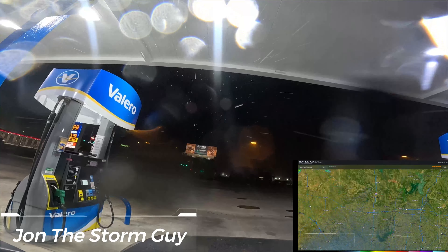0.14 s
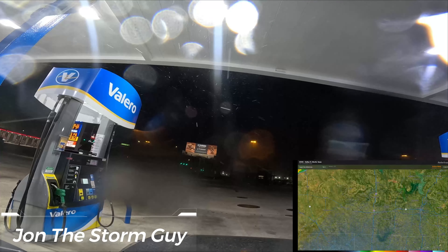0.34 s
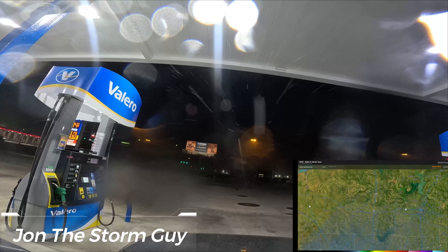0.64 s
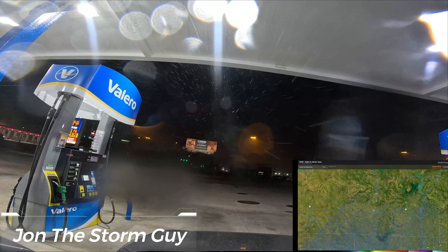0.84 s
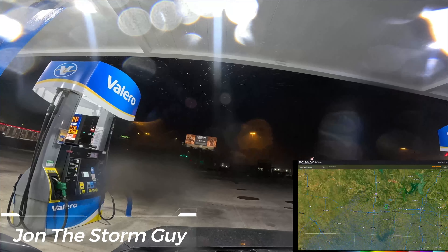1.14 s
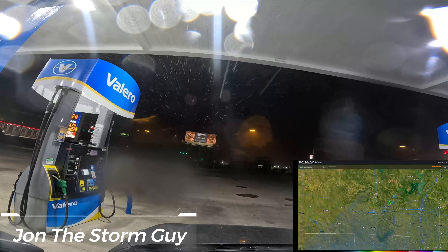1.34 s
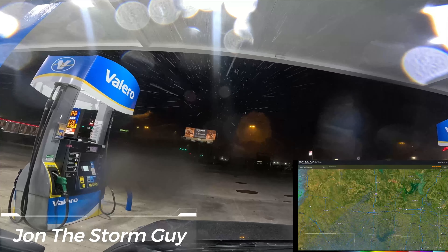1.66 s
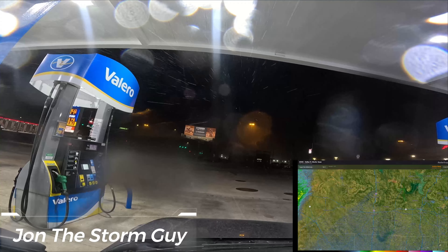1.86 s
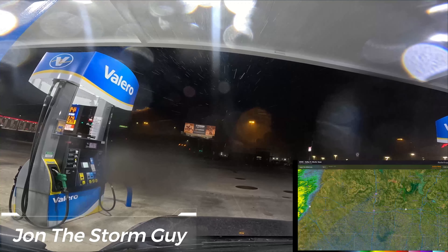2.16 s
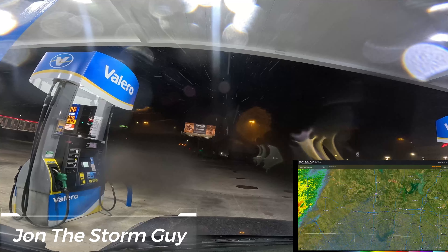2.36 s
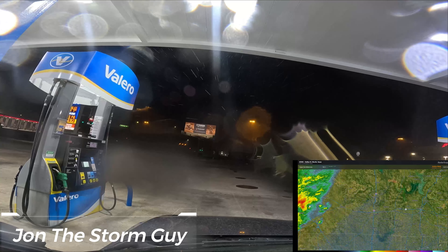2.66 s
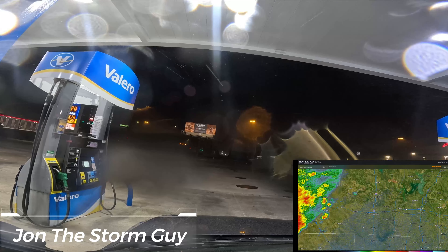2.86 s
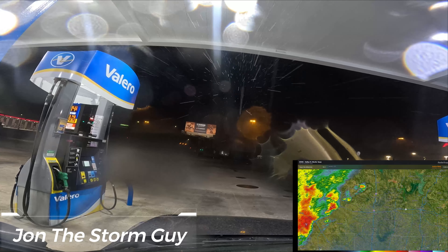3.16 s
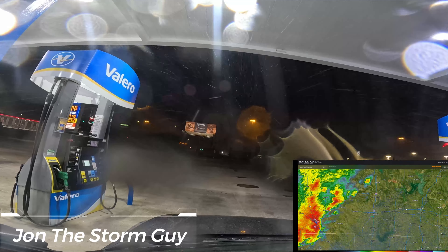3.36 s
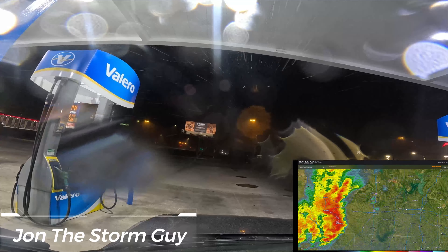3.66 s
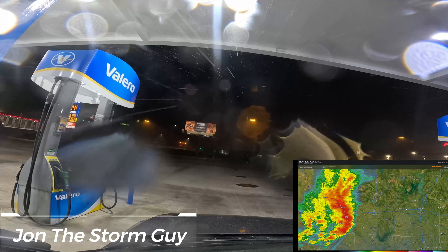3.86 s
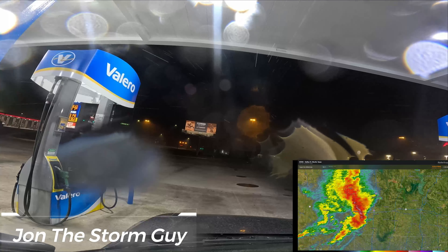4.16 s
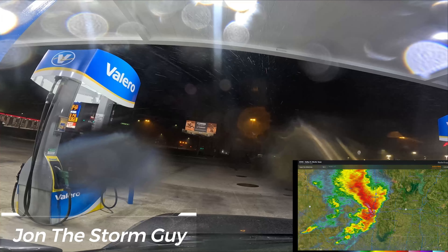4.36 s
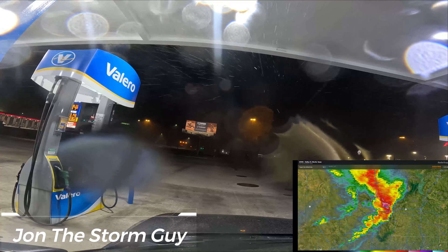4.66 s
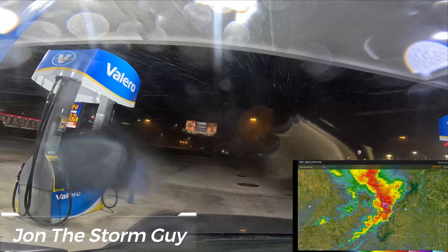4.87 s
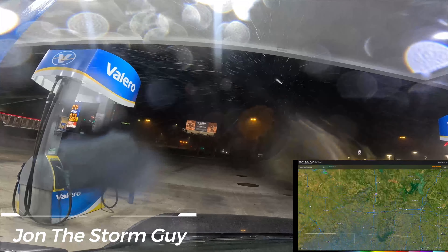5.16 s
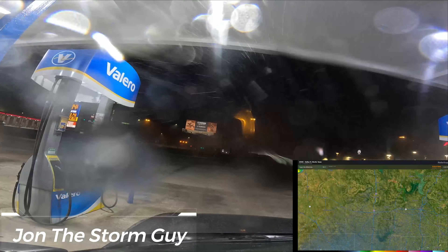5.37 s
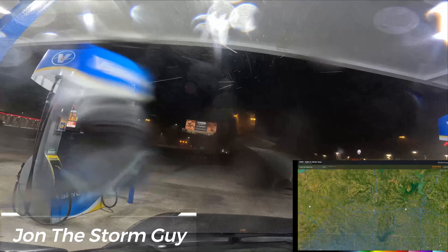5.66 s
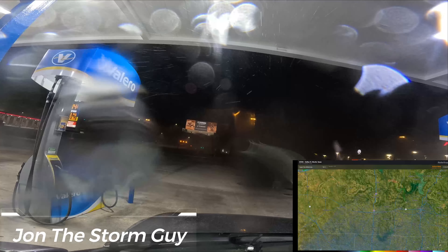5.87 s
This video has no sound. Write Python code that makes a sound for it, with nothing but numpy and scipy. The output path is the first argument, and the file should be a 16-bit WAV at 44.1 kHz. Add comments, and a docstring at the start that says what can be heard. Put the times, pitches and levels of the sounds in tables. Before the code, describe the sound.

Wind gusts rumble and tear at a small camera under a canopy while rain and hail tick sharply on its housing, thickening into dense flurries.

```python
"""Night storm at a small camera outside a car parked under a filling-station canopy.
Sharp gusts open it: noise rumbles, buffets and tears at the microphone ports; gusts recur to the end.
Struck resonances tick from the start as drops and hail hit the housing; at 0.7 s a stone knocks the body.
From 1.1 s the small drops come in flurries; from 4.6 s splats slosh and ring hollow, and gusts hoot.
Throughout, noise makes the downpour on canopy and forecourt, which grows towards the end."""
import sys
import numpy as np
from scipy import signal
from scipy.fft import rfft, irfft
from scipy.io import wavfile
from scipy.ndimage import uniform_filter1d, minimum_filter1d

SR = 44100
rng = np.random.default_rng(int(sys.argv[2]) if len(sys.argv) > 2 else 0)


def put_to_file(sound):
    """Save the sound as 16-bit audio at rate SR, in the file named by the first command-line argument."""
    columns = np.atleast_2d(sound).T  # one column per channel
    safe = np.clip(columns, -1, 1)
    whole_steps = np.round(safe * 32767)
    wavfile.write(sys.argv[1], SR, whole_steps.astype(np.int16))


N = 265041
TIME = np.arange(N) / SR
FREQS = np.fft.rfftfreq(N, 1 / SR)
SIDES = np.array([[1], [-1]])  # left, right

# wind between gusts, before trim: time_s, buffet_db
WIND = [(0, -20.5), (0.3, -26.5), (0.47, -31.5), (0.75, -32), (0.97, -28), (1.15, -27), (1.4, -27),
        (1.78, -25.5), (1.93, -33.5), (2.2, -24.5), (3.1, -27), (3.55, -26), (4.1, -25.5), (4.9, -25.5),
        (5.35, -29), (6.01, -23.5)]
# gusts: crest_s, length_s (crest to 1/e), rumble_rise_db, buffet_rise_db, tear_db
GUSTS = [(0.004, 0.0053, -7, 2.5, -26.5), (0.034, 0.008, -8, 4.5, -31), (0.053, 0.011, -7, -6.5, -56),
         (0.097, 0.01, 3, -2, -23), (0.135, 0.017, 3, 6, -24), (0.168, 0.017, -1, 6.5, -16),
         (0.214, 0.022, 2.5, 7, -18.5), (0.26, 0.024, 2.5, 3, -21.5), (0.329, 0.021, 4, 6, -29),
         (0.843, 0.021, 2.5, 1.5, -57), (1.095, 0.033, 2, 6.5, -40), (1.17, 0.026, 3, 7, -27.5),
         (1.286, 0.023, 5, 4, -40), (1.522, 0.057, 0.5, 5.5, -29), (1.71, 0.028, -4, 0, -25),
         (2.762, 0.09, 2.5, 4, -54), (3.102, 0.077, 1.5, 4.5, -32), (3.48, 0.024, 6, 2, -43),
         (3.928, 0.037, 3.5, 4.5, -31), (4.009, 0.02, 0.5, 0, -33), (4.112, 0.048, -1.5, 3.5, -53),
         (4.365, 0.059, -0.5, 4.5, -51), (4.477, 0.018, -4, 2, -39), (4.618, 0.016, 1, 8.5, -47),
         (4.81, 0.022, 2.5, -1, -48), (5.028, 0.038, 4, 4, -55), (5.094, 0.028, 1.5, 2, -23.5),
         (5.332, 0.021, 3.5, 5, -26.5), (5.561, 0.014, 3.5, 2.5, -23), (5.619, 0.04, 4.5, 6.5, -33),
         (5.808, 0.013, -8, 4, -24.5), (5.885, 0.026, 1.5, 2.5, -28.5)]
# large eddies let go of the ports: centre_s, length_s (centre to 1/e), rumble_change_db
LULLS = [(0.303, 0.013, -8), (0.45, 0.025, -5), (0.77, 0.018, -7), (0.91, 0.026, -6), (1.914, 0.032, -5),
         (2.2, 0.016, -8), (3.302, 0.03, -5), (3.525, 0.018, -4.5), (3.824, 0.0092, -5), (4.632, 0.012, -4),
         (5.378, 0.015, -6)]
# rumble follows the wind in part
RUMBLE_DB, RUMBLE_DB_PER_DB = -4, 0.5371
# noise colours of the wind, relative: frequency_hz, density_db
RUMBLE_COLOUR = [(10, -27), (24, 0), (45, -2.5), (80, -4), (120, -11.5), (200, -32), (400, -78),
                 (2000, -110)]
BUFFET_COLOUR = [(60, -13), (120, -1), (180, 0), (260, -6.5), (400, -14), (600, -20), (1000, -31.5),
                 (2000, -37.5), (10000, -100)]
TEAR_COLOUR = [(80, -3), (180, 11), (400, 7.5), (590, -0.5), (720, -4), (930, -1), (1400, -12.5),
               (1850, -12), (2500, -24.5), (3000, -26), (8000, -73), (15000, -85)]

# impacts that stand out on the housing: start_s, tick_db (energy as rms over 5 ms),
# slap_rel_tick_db, pitch_hz (nominal, of the 5360 Hz resonance)
HITS = [(0.0319, -34.5, -0.5, 5270), (0.075, -35.5, -9, 5300), (0.116, -31, -6, 5250),
        (0.1736, -38, -5, 5000), (0.29, -36.0, -5, 5020), (0.308, -33, -8, 5090), (0.3534, -29.5, -1, 5180),
        (0.487, -37.5, -7, 5540), (0.494, -27.5, 1, 5320), (0.5499, -35, -7, 5570), (0.6848, -26, 0, 4460),
        (0.697, -34, -11, 5500), (0.783, -30, -6.5, 5170), (0.806, -34, -4, 5430), (0.9103, -37, 4, 5000),
        (0.9813, -37, -3, 5400), (0.995, -24.5, -4, 5360), (1.0127, -33, -1, 5240), (1.0265, -33, 1, 5590),
        (1.0555, -24, -2.5, 5400), (1.0964, -34, 1, 5360), (1.1112, -23.5, -5, 5400), (1.126, -32, 2, 5280),
        (1.142, -32.5, -6, 5210), (1.162, -31, -9, 5700), (1.194, -30.5, -6, 5200),
        (1.2228, -34, -14, 5500), (1.3097, -25.5, -5, 5340), (1.3287, -23.5, -2, 5500),
        (1.3434, -29.5, -11, 5500), (1.432, -35, -7, 5600), (1.4398, -39, -14.5, 5400),
        (1.5242, -24.5, -7, 5330), (1.5594, -24.5, -8, 5700), (1.5759, -31, -3, 5200),
        (1.5832, -30, -1.5, 5270), (1.611, -22, -11, 5600), (1.6273, -28.5, -21, 5550),
        (1.6442, -35, -15, 5430), (1.6506, -31, -10, 5300), (1.6665, -36, -8, 5400),
        (1.683, -28.5, -4, 5100), (1.686, -24.5, -7, 5500), (1.7274, -30, -9, 5450),
        (1.7453, -30.0, -14, 5510), (1.762, -29.5, 3, 4700), (1.7685, -26.5, -1.5, 5630),
        (1.7745, -33, 1, 5190), (1.783, -20.5, -9, 5340), (1.7866, -26.5, -2, 5360),
        (1.8058, -34, -17, 5300), (1.8152, -30.5, -2, 5400), (1.822, -22.0, -8.5, 5360),
        (1.865, -22.5, -10, 5500), (1.8775, -34, -6, 5300), (1.8843, -25, -5, 5200),
        (1.8956, -22.5, -6, 5460), (1.9098, -32, -3, 5300), (1.919, -30, -6, 4600), (1.9774, -28, -5, 5400),
        (1.985, -35, -6, 5360), (2.0005, -35, -5, 5400), (2.0374, -27.0, 0.5, 5910),
        (2.143, -25.5, -13, 5360), (2.262, -29, -6, 5200), (2.34, -29.5, -2.5, 5160),
        (2.4033, -30, 0.5, 5400), (2.4324, -33, -6, 5700), (2.504, -32, -18, 5160), (2.5128, -32, -3, 5370),
        (2.5258, -32, -9, 5240), (2.531, -26.5, -5, 5160), (2.5977, -29.5, -1, 5130),
        (2.667, -25, -2, 5300), (2.7255, -31, -5, 5800), (2.7495, -31.5, -2, 5400),
        (2.759, -20.5, -5.5, 5360), (2.782, -25, -7.0, 4900), (2.794, -23, -4, 5380),
        (2.8689, -26.5, -4, 5130), (3.166, -24, -2, 5250), (3.1728, -25.5, -3.5, 5040),
        (3.211, -24.5, -3, 5400), (3.2713, -22.5, -12, 5470), (3.31, -30, 0.5, 5500),
        (3.3445, -31, -10.0, 5360), (3.3511, -26, -8.5, 5260), (3.354, -26.5, -8, 5300),
        (3.3734, -32, -8, 5500), (3.3942, -30.5, -7, 5570), (3.486, -30, -0.5, 5630),
        (3.4945, -27.5, -2.5, 5240), (3.547, -22.5, -6.5, 5620), (3.573, -26, -4.5, 5560),
        (3.5855, -25.5, -4.5, 5200), (3.665, -27.5, -4, 5700), (3.7392, -27.5, -18, 5470),
        (3.7518, -29, -11, 5390), (3.759, -28, 2.5, 5550), (3.795, -22, -6.5, 5600),
        (3.823, -28.5, 0, 5270), (3.8624, -30, -2, 5260), (3.878, -32, -1, 5400),
        (3.8847, -23.5, -10, 5330), (3.9042, -27, -5, 5440), (3.99, -27.5, -1, 5300),
        (4.0304, -23, -6, 5280), (4.053, -22, -12, 5360), (4.181, -24.5, -4.5, 5350),
        (4.1902, -32, -13, 5370), (4.2423, -20, -19, 5480), (4.3634, -35, -7, 5200),
        (4.345, -26.5, -7.5, 5500), (4.549, -30, -0.5, 5500), (4.5718, -26.5, -7, 5400),
        (4.5962, -22.5, -0.5, 5040), (4.6463, -24.5, -1.5, 5290), (4.6556, -27.5, -14, 5410),
        (4.6822, -27.5, -8, 5340), (4.6918, -28, -3, 5200), (4.7065, -25, -6, 5070),
        (4.7155, -20.5, -11, 5400), (4.7345, -24.5, -22, 5230), (4.775, -26.5, -7, 5150),
        (4.7798, -33, -10, 5300), (4.8034, -26, -18, 5400), (4.8106, -30, -10, 5400), (4.82, -28, -8, 5390),
        (4.8359, -22.5, -3.5, 5200), (4.8731, -31, -7, 5300), (4.889, -26, -7, 5400),
        (4.8939, -25.5, 0, 5350), (4.8986, -19.5, -7, 5340), (4.9074, -30, -1, 5530), (4.914, -33, 0, 5370),
        (4.917, -25, -2.5, 5400), (4.9197, -22, -9, 5400), (4.941, -27, -16, 5430),
        (4.9474, -22, -12, 5370), (4.96, -27, 1.5, 5340), (4.9725, -29, -2, 5300),
        (4.977, -25.5, -1.5, 5240), (4.9815, -21, -5.5, 5200), (4.993, -23.5, -8, 5310),
        (4.9987, -28.5, 1, 5400), (5.0652, -25, -5, 5200), (5.1009, -28.5, 1.5, 5530),
        (5.126, -17, -7, 5550), (5.1378, -27.5, -5, 5360), (5.1682, -24, 1.5, 5300),
        (5.1833, -30, -5, 5440), (5.189, -23, -3, 5370), (5.221, -27, -2, 5260), (5.2279, -25, -4, 5300),
        (5.2309, -21, -8, 5270), (5.246, -28, -5, 5410), (5.3007, -23, -8, 5660),
        (5.3384, -25.5, -0.5, 5840), (5.3459, -17.5, -5, 5500), (5.3548, -24, -1, 5270),
        (5.3881, -21.5, -4, 5370), (5.406, -25, 1, 5400), (5.4146, -24.5, -8, 5300),
        (5.4325, -35, -5, 5400), (5.445, -21.5, -7, 5200), (5.4538, -19.5, -5, 5440),
        (5.46, -23, 0.5, 5440), (5.4647, -27, -1, 5440), (5.4762, -34, -6, 5400), (5.486, -21.0, -7, 5260),
        (5.5099, -28.0, 0, 5060), (5.565, -25.5, -6, 5000), (5.601, -23.5, -3, 5420),
        (5.6151, -26, 1, 5540), (5.6526, -26.5, -3, 5660), (5.6683, -29.0, -10, 5550),
        (5.6884, -26, -5, 5400), (5.6941, -31, -12, 5400), (5.6974, -23, -16, 5340),
        (5.7053, -28, -10, 5300), (5.749, -26.5, -10, 6000), (5.759, -28, -8, 5250),
        (5.777, -25.5, -8, 5500), (5.8263, -22.5, -6.5, 5870), (5.903, -23, 4, 5400)]
# housing and port resonances, nominal: frequency_hz, width_hz, level_db, left_minus_right_db, left_lead_rad
HOUSING = [(1190, 310, -11.5, -5, -0.37), (1820, 1180, 0.5, 4, -0.54), (2786, 790, -3.5, 8, 0.73),
           (3920, 310, -3, 4.5, 1), (5360, 1060, 6.5, -3.5, 0.14), (5830, 1960, -2, 1, 0.19),
           (6950, 3140, -14.5, 1.5, 0.44), (8580, 830, -16, 4, 1)]
# usual tick pitch, its spread from drop to drop as a share, and decay of the splash
TICK_HZ, TICK_SPREAD, SPLASH_S = 5360, 0.033, 0.003
# flurries of blown drops: crest_s, length_s (crest to 1/e), patter_rise_db
FLURRIES = [(1.102, 0.12, 13.5), (1.744, 0.17, 17), (2.512, 0.08, 9), (3.342, 0.08, 9), (4.716, 0.1, 4),
            (4.928, 0.06, 12), (5.44, 0.07, 10), (5.711, 0.08, 8)]
# patter drive above the hiss setting; rise of the hiss setting with a flurry
PATTER_OVER_HISS_DB, SPRAY_DB_PER_DB = -2, 0.28
# smallest drop at 0 dB drive, its slope with the drive, range of drop sizes
DROP_DB, DROP_DB_PER_DB, DROP_RANGE_DB = -18, 1.1, 18.5

# large stone: start, time constant of the contact
KNOCK_S, KNOCK_CONTACT_S = 0.685, 0.00045
# rings of the camera body: frequency_hz, level_db, t60_s
BODY = [(556, -15.5, 0.034), (944, -17.5, 0.044), (1244, -19.5, 0.032), (1940, -19, 0.018)]

# heavy splats: start_s, level_db, ring_rise_s, ring_decay_s, ring_hz, ring_step_hz, slosh_rel_ring_db
SPLATS = [(4.597, -18, 0.01, 0.02, 505, 545, -1), (5.898, -26.5, 0.0025, 0.011, 520, 545, 7.5),
          (5.97, -13, 0.0019, 0.0029, 348, 75.4, -19)]
# rings of the hollow, lowest first: width_hz (full, at -6 dB), level_db
HOLLOW = [(20, -2), (50, -7.5), (80, -11.5)]
# noise colour of sloshing water, relative: frequency_hz, density_db
SLOSH_COLOUR = [(80, -7), (150, -5), (330, -2), (750, 1), (1550, -8), (2300, -11.5), (5000, -29),
                (12000, -60)]
SLOSH_SPEED = 1.9  # times the speed of the ring's envelope
# gusts across the hollow: crest_s, length_s (crest to 1/e), level_db
HOOTS = [(4.587, 0.021, -29), (5.102, 0.016, -30), (5.308, 0.022, -28), (5.607, 0.065, -35),
         (5.864, 0.011, -30)]
HOOT_HZ, HOOT_STEP_HZ = 520, 545

# downpour, before trims: time_s, roar_db (canopy), hiss_db (spray)
RAIN = [(0, -46, -57.5), (0.8, -46.5, -57.5), (1.2, -42, -53), (2.05, -42.5, -54), (2.5, -40.5, -49),
        (3.2, -41.5, -52), (3.85, -39.5, -48), (4.5, -41, -47.5), (5.0, -39, -45), (5.3, -43.5, -47),
        (5.55, -39.5, -42), (6.01, -36, -45)]
# noise colours of the rain, relative: frequency_hz, density_db
ROAR_COLOUR = [(200, -3), (500, 3), (780, -2), (940, 7), (1100, 4), (1320, -3.5), (1600, -1), (1900, -0.5),
               (2350, -16.5), (2900, -7.5), (3400, -18.5), (4300, -39), (8000, -38)]
HISS_COLOUR = [(1800, -8), (2900, -0.5), (3700, 4), (4200, -2), (5150, 6), (6200, -0.5), (7500, -2.5),
               (8200, -8), (10000, -11), (11000, -39), (15000, -60)]
# width of the rain: frequency_hz, side_minus_mid_db
RAIN_SPREAD = [(100, -53), (500, -5), (1000, -13), (2000, -8), (3100, 0), (4200, -5), (5500, -17),
               (10000, -6.5)]
# finest droplets: rate, level above the hiss setting, range of sizes
DROPLETS_PER_S, DROPLET_OVER_HISS_DB, DROPLET_RANGE_DB = 240, -1, 25

# microphone treble: frequency_hz, gain_db
MICROPHONE = [(8000, 0.5), (10000, 0), (11000, -7.5), (13000, -3.5), (15000, -9)]
TOP_HZ = 15500  # recorder cutoff


def wind():
    """Large eddies rumble, small ones buffet in quick puffs, the sharpest gusts tear up into the mids."""
    buffet_db, = curves(WIND)
    rumble_db, gust_tearing = RUMBLE_DB + RUMBLE_DB_PER_DB * buffet_db, 0
    for crest_s, length_s, rumble_rise_db, buffet_rise_db, tear_db in GUSTS:
        gust = swell(crest_s, length_s)
        rumble_db = rumble_db + rumble_rise_db * gust
        buffet_db = buffet_db + buffet_rise_db * gust
        gust_tearing = gust_tearing + undb(tear_db) * gust
    for centre_s, length_s, change_db in LULLS:
        rumble_db = rumble_db + change_db * swell(centre_s, length_s)

    rumble = steady(noise(colour(RUMBLE_COLOUR), side=undb(-22.0)), window_s=0.0435)
    rumble = rumble * undb(rumble_db + 0.83 * walk(rate_hz=22))

    puffs = undb(1.18 * walk(rate_hz=90))
    buffet = steady(noise(colour(BUFFET_COLOUR), side=undb(-18.0)) * puffs, window_s=0.087)
    buffet = buffet * undb(buffet_db + 1.28)

    # tearing grows as the square of weak buffeting, in proportion to strong
    force = undb(2 * buffet_db + 5.5) / (1 + undb(buffet_db + 21.0)) + gust_tearing
    flicker = undb(2.4 * walk(rate_hz=130))
    tear = steady(noise(colour(TEAR_COLOUR), side=undb(-11.5)) * flicker, window_s=0.034)
    return rumble + buffet + force * tear


def hail():
    """Big drops and stones strike the housing squarely and ring its resonances."""
    return strikes(*np.transpose(HITS))


def patter(drive_db, count=800):
    """Small drops of many sizes strike thicker and harder in each flurry."""
    chance = rng.random((count, 3))
    # equal shares of the summed flux give the landing times
    flux = np.cumsum(undb(.9 * drive_db))
    share = (np.arange(count) + chance[:, 0]) / count
    start_s = np.interp(share, flux / flux[-1], TIME)
    size_db = DROP_RANGE_DB * chance[:, 1] ** 1.1
    tick_db = DROP_DB + DROP_DB_PER_DB * np.interp(start_s, TIME, drive_db) + size_db
    slap_db = -11 + 13.6 * chance[:, 2]
    pitch_hz = TICK_HZ * (1 + TICK_SPREAD * rng.standard_normal(count))
    return strikes(start_s, tick_db, slap_db, pitch_hz)


def strikes(start_s, tick_db, slap_db, pitch_hz, scatter_db=3.0, bend=0.017, tilt_db=5, aside_db=1.5,
            crush_db=-9, crush_s=0.00014, splash_db=-28, size=640):
    """Each impact is a click, a rough crush and a fading splash that ring the housing resonances."""
    f, t = np.fft.rfftfreq(size, 1 / SR), np.arange(size) / SR
    hz, width_hz, level_db, pan_db, lead_rad = np.transpose(HOUSING)
    # the landing spot sets the mix, bends the pitches and favours one port
    spot = rng.standard_normal((len(start_s), 4, len(hz), 1))
    mode_hz = hz[:, None] * (pitch_hz[:, None, None] / TICK_HZ + bend * spot[:, 1])
    modes = undb(level_db[:, None] + scatter_db * spot[:, 0]) * resonance(f, mode_hz, width_hz[:, None])
    # some impacts tick brighter than others: random treble tilt
    brightness = rng.standard_normal((len(start_s), 1, 1))
    modes = modes * undb(tilt_db * brightness * np.log2(np.clip(f / TICK_HZ, 1, 1.7)))
    port_gain = undb(SIDES * (pan_db / 2 + aside_db * spot[:, None, 3, :, 0]))
    ports = port_gain * np.exp(.5j * SIDES * lead_rad)

    # splash level varies at random from impact to impact
    splash = undb(splash_db + 6.7 * spot[:, 2, 0]) * np.exp(-t / SPLASH_S)
    # rough contact of random length
    contact = t / (crush_s * np.exp(0.58 * spot[:, 2, 1]))
    crush = undb(crush_db) * contact * np.exp(1 - contact)
    push = (t == 0) + (crush + splash) * rng.standard_normal((len(start_s), size))
    early = 64  # samples of lead-in, dropped on return
    push = rfft(np.pad(push, ((0, 0), (early, 0))), size)[:, None]

    low = hz < 4400  # low resonances slap, high ones tick
    sounds = 0
    for group, group_db in ((~low, tick_db), (low, tick_db + slap_db)):
        ring = irfft((ports[..., group] @ modes[:, group]) * push, size)
        energy = np.sum(ring.mean(axis=1) ** 2, axis=1)
        rms = np.sqrt(energy / (.005 * SR))
        sounds = sounds + ring * (undb(group_db) / rms)[:, None, None]
    out = np.zeros((2, N + size))
    for start, sound in zip(np.clip(start_s * SR, 0, N).astype(int), sounds):
        out[:, start:start + size] += sound
    return out[:, early:early + N]


def knock():
    """One large stone knocks the camera body, whose low modes ring as decaying sines."""
    age = np.maximum(TIME - KNOCK_S, 0)
    body = 0
    for hz, level_db, t60_s in BODY:
        body = body + undb(level_db) * np.sin(2 * np.pi * hz * age) * undb(-60 * age / t60_s)
    return body * (1 - np.exp(-age / KNOCK_CONTACT_S))


def splats():
    """Water sloshes over the ports as noise; a hollow ring builds up later and outlasts it."""
    out = 0
    water = steady(noise(colour(SLOSH_COLOUR), side=undb(-8.0)), window_s=0.0104)
    for start_s, level_db, rise_s, decay_s, hz, step_hz, slosh_db in SPLATS:
        age = np.maximum(TIME - start_s, 0)
        ring, slosh = ((1 - np.exp(-a / rise_s)) * np.exp(-a / decay_s) for a in (age, age * SLOSH_SPEED))
        ringing = ring / ring.max() * hollow(hz, step_hz)
        sloshing = undb(slosh_db) * slosh / slosh.max() * water
        out = out + undb(level_db) * (ringing + sloshing)
    return out


def hoots():
    """Gusts blow across the cavity and sound its rings briefly."""
    strength = sum(undb(level_db) * swell(crest_s, length_s) for crest_s, length_s, level_db in HOOTS)
    return hollow(HOOT_HZ, HOOT_STEP_HZ) * strength


def hollow(hz, step_hz):
    """Three cavity rings, each a narrow band of noise that wavers a little in pitch."""
    out = 0
    for k, (width_hz, level_db) in enumerate(HOLLOW):
        band = abs(resonance(FREQS, hz + k * step_hz, width_hz))
        out = out + undb(level_db) * steady(noise(band, side=undb(-15.0)), window_s=0.0105)
    return out


def downpour(roar_db, hiss_db):
    """Countless far drops merge into canopy roar and flickering hiss; nearer droplets crackle through."""
    # roar leans left
    roar_gain = undb(roar_db + 3.5 + 1.26 * walk(rate_hz=170) + SIDES * 2.24)
    roar = noise(colour(ROAR_COLOUR), colour(RAIN_SPREAD)) * roar_gain
    hiss_gain = undb(hiss_db + 2.03 + 2.73 * walk(rate_hz=220))
    hiss = noise(colour(HISS_COLOUR), colour(RAIN_SPREAD)) * hiss_gain
    return roar + hiss + droplets() * undb(hiss_db + DROPLET_OVER_HISS_DB)


def droplets():
    """Fine wind-blown droplets: random clicks, panned a little, ring the higher housing modes; rms 1."""
    lands, strength, place = rng.random((3, N))
    click_db = DROPLET_RANGE_DB * strength + SIDES * 7 * (place - .5)
    clicks = (lands < DROPLETS_PER_S / SR) * undb(click_db)
    ring = 0
    for hz, width_hz, level_db, _, _ in HOUSING:
        if hz > 2500:
            ring = ring + undb(level_db) * resonance(FREQS, hz, width_hz)
    x = irfft(rfft(clicks) * ring, N)
    return x / x.std()


def undb(db):
    """Decibels to gain."""
    return 10 ** (np.asarray(db) / 20)


def curves(table):
    """Columns of a time table, joined by straight lines."""
    s, *columns = np.transpose(table)
    return [np.interp(TIME, s, c) for c in columns]


def colour(points):
    """Gain over FREQS of a (Hz, dB) spectrum, linear in dB over log frequency."""
    hz, db = np.transpose(points)
    return undb(np.interp(np.log(FREQS + 1), np.log(hz), db))


def resonance(f, hz, width_hz):
    """Response of a doubly damped resonance, which swells and dies."""
    return 1 / (1 + 2j * (f - hz) / width_hz) ** 2


def noise(gain, side):
    """Coloured stereo noise of rms 1; side is the gain of side against mid."""
    mid, wide = rfft(rng.standard_normal((2, N)))
    x = irfft(gain * (mid + SIDES * side * wide), N)
    return x / x.std()


def walk(rate_hz):
    """Slow chance: random levels held 1 / rate_hz, slewed twice."""
    k = max(int(SR / rate_hz), 2)
    held = rng.standard_normal(N)[np.arange(N) // k]
    return 2.4 * uniform_filter1d(uniform_filter1d(held, k), k)


def steady(x, window_s):
    """Evens out slow swells by dividing by the running rms."""
    power = uniform_filter1d(np.mean(x ** 2, axis=0), int(window_s * SR))
    return x / np.sqrt(power + 1e-9)


def swell(crest_s, length_s):
    """Smooth rise and fall, 1 at the crest."""
    return np.exp(-((TIME - crest_s) / length_s) ** 2)


def scene():
    """Sum of the wind, the rain all around and what lands on the camera."""
    roar_db, hiss_db = curves(RAIN)
    flurry_db = sum(rise_db * swell(crest_s, length_s) for crest_s, length_s, rise_db in FLURRIES)
    rain = downpour(roar_db, hiss_db + SPRAY_DB_PER_DB * flurry_db)
    drops = patter(hiss_db + PATTER_OVER_HISS_DB + flurry_db)
    return wind() + rain + hail() + drops + knock() + splats() + hoots()


def record(dry):
    """The microphone shapes the treble, a limiter holds the peaks, the recorder cuts the top."""
    dull = irfft(rfft(dry) * colour(MICROPHONE), N)
    room = np.minimum(1, .87 / (abs(dull).max(axis=0) + 1e-9))
    gain = uniform_filter1d(minimum_filter1d(room, size=257), size=257)
    lowpass = signal.ellip(8, .2, 70, TOP_HZ, fs=SR, output="sos")
    return signal.sosfilt(lowpass, dull * gain)


dry = scene()
out = record(dry)
put_to_file(out)
```